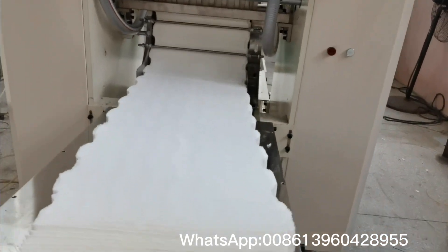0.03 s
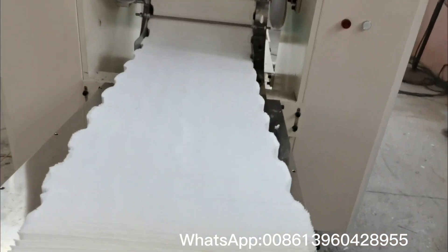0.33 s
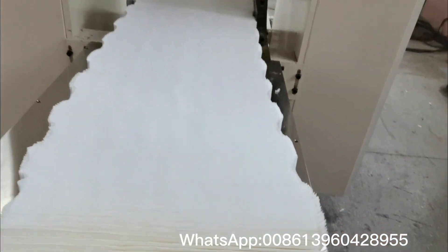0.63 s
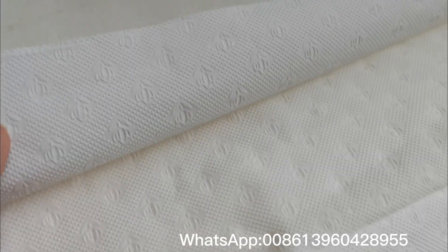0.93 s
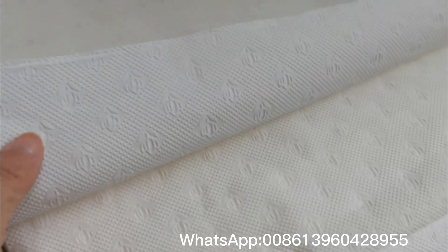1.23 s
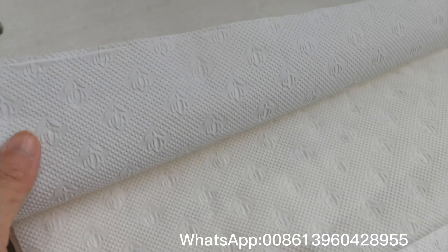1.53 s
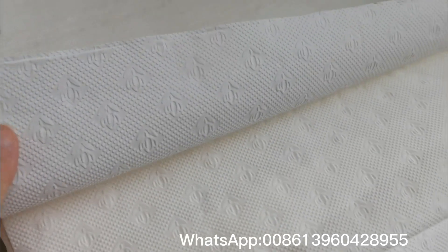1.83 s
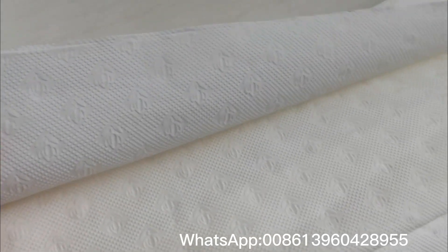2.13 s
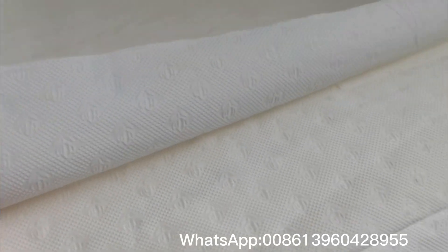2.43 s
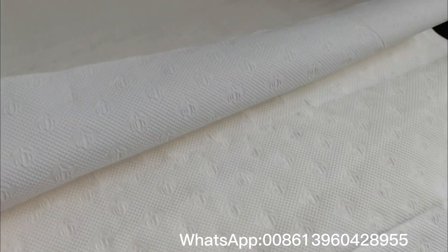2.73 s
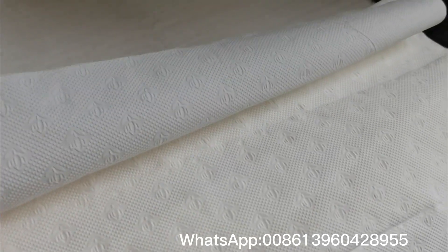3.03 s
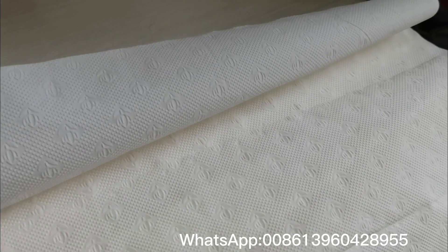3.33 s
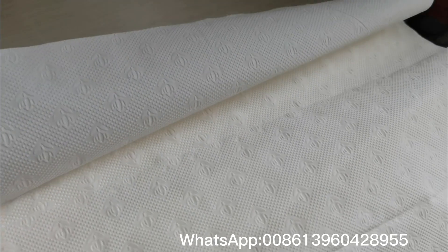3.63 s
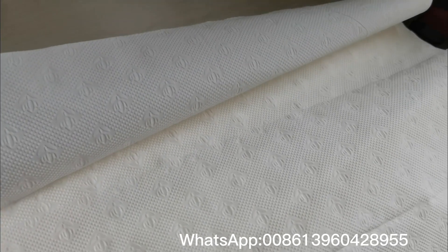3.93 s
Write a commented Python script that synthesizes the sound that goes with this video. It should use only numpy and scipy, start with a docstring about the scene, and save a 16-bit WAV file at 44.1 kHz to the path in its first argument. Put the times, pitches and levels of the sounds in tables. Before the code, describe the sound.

A tissue paper machine runs close by, rumbling and hissing with rapid clacks and swishes. It cuts abruptly to a quieter factory hum and hiss, where a hand rustles tissue, which squeaks twice and slides with thin whistles.

```python
"""Close to a tissue converting machine, on a two-port stereo microphone: the rolls rumble, the paper web
hisses, and each turn brings a metal clack, a thud and one or two swishes of paper. At 0.78 s we cut to a
quieter spot with motor hum, whine and hiss. There a hand moves the tissue: it rustles, a rub sets in,
and it squeaks twice as the grip gives way. Then it slides with thin whistles while the rub falls in
pitch, and the drag raises a low groan that fades back into the hum."""
import sys
import numpy as np
from scipy import signal
from scipy.fft import rfft, irfft
from scipy.io import wavfile
from scipy.ndimage import uniform_filter1d

SR = 44100
rng = np.random.default_rng(int(sys.argv[2]) if len(sys.argv) > 2 else 0)


def persist_wave(psi):
    """Save psi, clipped to +-1, as 16-bit WAV."""
    counts = np.round(np.clip(psi, -1, 1) * 32767).astype(np.int16)
    wavfile.write(sys.argv[1], SR, np.atleast_2d(counts).T)


N = 176400
CUT_S, FIRST_THUD_S, TURN_S = .78, .1323, .132
MOTOR_HZ, WHINE_HZ = 78.6, 2969
ALIKE_BELOW_HZ, TOP_HZ = 800, 15700  # both ports hear the bass alike; the microphone's upper limit

# Noise colours, at the machine and then at the quieter spot.
# Each row: frequency in Hz, relative spectral level in dB.
RUMBLE_SPECTRUM = [(40, -56), (87, -8.5), (155, -3), (205, -5.5), (375, -3), (530, -14), (730, -17),
                   (1100, -22.5), (1820, -48)]
WEB_SPECTRUM = [(530, -17), (900, -11), (1370, -5.5), (2200, -1.5), (4310, -9.5), (5450, -4), (6820, -9.5),
                (7490, -3), (8630, 1.5), (9040, 0), (9820, -18.5), (11200, -17), (11900, -53), (12300, -54),
                (15000, -53)]
SWISH_SPECTRUM = [(1500, -35), (3000, -12), (4300, -8.5), (5400, 1.5), (6600, -4.5), (8700, 7.5),
                  (9800, -5), (12000, -26), (15500, -42)]
SLAP_SPECTRUM = [(900, -20), (1600, -4), (2100, 4.5), (2600, 5.5), (3400, -8), (6000, -25)]
HISS_SPECTRUM = [(1100, -15.5), (1400, -13.5), (1720, -12.5), (2300, -6.5), (2500, -6.5), (2800, -6.5),
                 (3350, -4.5), (3700, -6.5), (4450, -7.5), (5100, -1.5), (5800, -2), (6750, -4.5),
                 (7400, -2), (8600, 3.5), (9250, 0), (9900, -8), (11200, -16), (12200, -33.5), (15000, -42)]
HALL_SPECTRUM = [(50, -24), (75, -3.5), (130, -0.5), (210, 4.5), (330, -5.5), (450, -8.5), (750, -8.5),
                 (950, -12), (1150, -16), (1700, -49)]
HANDLING_SPECTRUM = [(50, -31), (80, -1), (170, 2), (330, 1), (430, -7), (800, -13)]
RUSTLE_SPECTRUM = [(1200, -32), (2200, -35), (4300, -15), (5600, -10), (6700, -10), (8150, -2), (8700, 6.5),
                   (9700, -12), (11500, -21.5), (13000, -42)]
SCRAPE_SPECTRUM = [(1200, -47), (1800, -3), (3000, -5.5), (4200, -2.5), (5400, 6.5), (7000, -7.5),
                   (8700, 10.5), (9900, -11), (12500, -38)]
SLIDE_SPECTRUM = [(900, -11), (1150, -4), (1500, 0), (1800, -9.5), (2350, -3.5), (2500, 3), (2600, 9),
                  (2720, -3), (3100, -4.5), (4500, -30)]
# Resonances of the machine's frame and of the drag. Each row: frequency in Hz, level in dB.
FRAME_MODES = [(243, -36.5), (306, -35), (917, -49.5)]
GROAN_MODES = [(194, -35.5), (236, -37), (322, -40), (358, -43)]
# Bursts of paper noise. Each row: peak time in seconds, decay in seconds, level in dB.
SWISHES = [(0.023, 0.0078, -17.5), (0.155, 0.0043, -18), (0.211, 0.028, -22.5), (0.29, 0.0087, -18.5),
           (0.353, 0.023, -22.5), (0.41, 0.085, -20), (0.551, 0.0039, -20.5), (0.615, 0.0088, -22.5),
           (0.684, 0.016, -21), (.750, .01, -21)]
RUSTLES = [(.80, 0.03, -31), (.845, 0.11, -32.5), (.945, .03, -36), (.988, 0.018, -34),
           (1.051, 0.01, -29.5), (1.16, 0.091, -30.5), (1.215, 0.025, -36), (1.295, 0.053, -36.5),
           (1.44, 0.11, -35), (1.897, 0.046, -28)]
SCRAPES = [(1.824, .018, -20.5), (1.856, .022, -23), (2.022, .012, -30)]
# Metal clacks, one a turn. Each row: peak time in seconds, slap level in dB, ring level in dB.
CLACKS = [(.024, -22, -24.5), (.154, -23.5, -24), (.290, -25, -27.5), (.421, -29, -29.5), (0.548, -26, -26),
          (.683, -24, -34)]
# The struck metal's ring. Each row: frequency in Hz, decay in seconds, relative level in dB.
CLACK_MODES = [(2140, .007, 0), (2640, .014, -3)]
# The motor's tones. Each row: multiple of its rate, base level in dB, left minus right in dB.
HUM_HARMONICS = [(2, -62, 7), (3, -40, 2.5), (5, -60.5, -11), (6, -55, 6), (7, -60.5, 12)]
WHINE_HARMONICS = [(11, -57.5, -17), (12, -51.5, -15), (13, -53, -1)]
# How near the microphone is to those tones. Each row: time in seconds, gain in dB.
HUM_NEARNESS = [(.8, -5), (1.4, -4.5), (1.65, -.5), (2.5, 2), (2.75, -2), (4, 1)]
WHINE_NEARNESS = [(.8, -13.5), (2.3, -8), (3, -6.5), (3.5, -3), (4, -3)]
# Swells of the continuous noises. Each row: time in seconds, level in dB.
HISS_LEVELS = [(.8, -36), (1.4, -34.5), (2.2, -34.5), (2.7, -37), (4, -37.5)]
HANDLING_LEVELS = [(.8, -42.5), (.95, -37.5), (1.01, -44.5), (1.19, -43), (1.3, -46), (1.6, -44.5),
                   (1.8, -54), (2.12, -51.5), (2.25, -42.5), (2.7, -44), (3.1, -63)]
SLIDE_LEVELS = [(2.05, -47), (2.12, -36.5), (2.45, -38.5), (2.6, -45.5), (3.05, -50)]
# Friction tones: one rub, two squeaks, two whistles and the second whistle's overtone. Each row: time in
# seconds, pitch in Hz, level in dB.
RUB_PATH = [(1.0, 1919, -43), (1.45, 1925, -44.5), (1.6, 1960, -39.5), (1.78, 1833, -42),
            (1.92, 1648, -34.5), (2.04, 1455, -39.5), (2.15, 1307, -39), (2.4, 1258, -43), (2.6, 1338, -44)]
SQUEAK_PATHS = [
    [(1.266, 3100, -40), (1.281, 2740, -30), (1.31, 2800, -31), (1.345, 2650, -48)],
    [(1.815, 2880, -42), (1.821, 2900, -23), (1.836, 3000, -24), (1.848, 2680, -26), (1.868, 2560, -30),
     (1.885, 2480, -44)],
]
WHISTLE_PATHS = [
    [(1.89, 7300, -42), (1.92, 7280, -33), (2.06, 7230, -35), (2.16, 7200, -42), (2.45, 7150, -52)],
    [(2.025, 5950, -46), (2.055, 6160, -31), (2.1, 6260, -33), (2.135, 6700, -47), (2.25, 6930, -47),
     (2.7, 7000, -54)],
    [(2.16, 13680, -60), (2.36, 13950, -61), (2.68, 13950, -66), (2.88, 14550, -67), (3.1, 14700, -75)],
]
# Each entry: the bandwidth in Hz of one whistle, then of the second whistle's overtone.
WHISTLE_WIDTHS_HZ = [400, 130, 73]
# Balance of the microphone's ports. Each row: frequency in Hz, left minus right in dB.
PORT_BALANCE = [(100, -1.5), (400, -0.5), (1300, -0.5), (2400, -7.5), (3500, -2.5), (4400, -8),
                (5400, -16.5), (7000, -7), (8200, -.3), (9200, -1.1), (15000, 3.5)]


def undb(db):
    """Decibels to gain."""
    return 10 ** (np.asarray(db) / 20)


def pan(db):
    """Left and right gains, the left higher by db."""
    return undb(np.array([[1], [-1]]) * db / 2)


def times():
    """Time of each sample in seconds."""
    return np.arange(N) / SR


def bin_hz():
    """Frequency of each spectral bin."""
    return np.arange(N // 2 + 1) * SR / N


def unit(x):
    """Scale to rms 1."""
    return x / np.sqrt(np.mean(x ** 2))


def curve(rows, column=1):
    """One column of a table, joined by straight lines in time and held beyond its ends."""
    rows = np.array(rows)
    return np.interp(times(), rows[:, 0], rows[:, column])


def per_bin(points):
    """A table over log frequency, read at every spectral bin."""
    hz, value = np.array(points).T
    return np.interp(np.log(bin_hz() + 1), np.log(hz), value)


def walk(rate):
    """A smooth random drift with spread 1, changing about rate times a second."""
    return unit(irfft(rfft(rng.standard_normal(N)) / (1 + (bin_hz() / rate) ** 4), N))


def noise(spectrum, likeness=0):
    """Coloured stereo noise; both ports share its bass, and likeness is their share of its treble."""
    share = 1 - (1 - likeness) * (1 - np.exp(-(bin_hz() / ALIKE_BELOW_HZ) ** 2))
    common = np.sqrt(share) * rfft(rng.standard_normal(N))
    apart = np.sqrt(1 - share) * rfft(rng.standard_normal((2, N)))
    tapered = [(spectrum[0][0] / 2, -70), *spectrum, (spectrum[-1][0] * 2, -70)]
    return unit(irfft((common + apart) * undb(per_bin(tapered)), N))


def burst(at, rise_s, decay_s):
    """A rounded rise to a peak, then an exponential decay."""
    age = times() - at
    return np.exp(-(np.minimum(age, 0) / rise_s) ** 2 / 2 - np.maximum(age, 0) / decay_s)


def bursts(rows, rise_s):
    """The envelope of a table of bursts."""
    return sum(undb(db) * burst(at, rise_s, decay_s) for at, decay_s, db in rows)


def ping(at, hz, rise_s, decay_s, sag_hz_per_s=0):
    """A short ring whose pitch may sag steadily."""
    age = times() - at
    return burst(at, rise_s, decay_s) * np.sin(2 * np.pi * (hz * age - sag_hz_per_s * age ** 2 / 2))


def wavering(hz, width_hz, likeness):
    """A narrow, randomly driven resonance; likeness is the share common to both ports."""
    common, left, right = (walk(width_hz / 2) + 1j * walk(width_hz / 2) for _ in range(3))
    drive = np.sqrt(likeness) * common + np.sqrt(1 - likeness) * np.array([left, right])
    return np.real(drive * np.exp(2j * np.pi * np.cumsum(hz * np.ones(N)) / SR))


def glide(path, partials_db, width_hz, likeness):
    """A friction tone along a path of pitch and level; higher partials are rougher."""
    sounding = (times() > path[0][0]) & (times() < path[-1][0])
    gate = uniform_filter1d(sounding.astype(float), size=200)
    tone = sum(undb(db) * wavering(k * curve(path), k * width_hz, likeness)
               for k, db in enumerate(partials_db, 1))
    return tone * gate * undb(curve(path, column=2))


def rolls():
    """The rolls rumble close by, and the frame rings under them."""
    rumble = noise(RUMBLE_SPECTRUM) * undb(-26.5)
    frame = sum(undb(db) * wavering(hz, width_hz=20, likeness=1) for hz, db in FRAME_MODES)
    return rumble + frame


def paper_web():
    """The running web hisses and flutters, wide across the microphone."""
    return noise(WEB_SPECTRUM, likeness=.16) * undb(-26.5 + 1.47 * walk(rate=51))


def swishes():
    """Paper swishes through the machine, almost alike at both ports."""
    return bursts(SWISHES, rise_s=.0052) * noise(SWISH_SPECTRUM, likeness=.97)


def clacks():
    """Metal strikes once a turn: a noisy slap and a short ring."""
    rings = sum(undb(db + mode_db) * ping(at, hz, rise_s=.002, decay_s=decay_s)
                for at, _, db in CLACKS for hz, decay_s, mode_db in CLACK_MODES)
    slaps = sum(undb(db) * burst(at, rise_s=.002, decay_s=.0098) for at, db, _ in CLACKS)
    return rings + slaps * noise(SLAP_SPECTRUM, likeness=.17)


def thud(at):
    """One swing of pressure, and the frame's short boom around it."""
    swing = (times() - at) / .0008
    push = undb(-18) * swing * np.exp(-swing ** 2 / 2)
    boom = undb(-20.5) * ping(at, hz=164.4, rise_s=.0069, decay_s=.01)
    return push + boom


def motor(harmonics, nearness):
    """Slightly unsteady multiples of the motor's rate, louder as the microphone is nearer."""
    turns = np.cumsum(MOTOR_HZ * (1 + .00082 * walk(rate=1.9))) / SR
    tones = 0
    for k, db, pan_db in harmonics:
        amplitude = np.sqrt(2) * undb(db + walk(rate=1.6)) * pan(pan_db)
        tones += amplitude * np.sin(2 * np.pi * (k * turns + rng.random()))
    return tones * undb(curve(nearness))


def high_whine():
    """A faint tone wavers in level inside a narrow band of noise."""
    band = undb(-53.5) * wavering(WHINE_HZ, width_hz=110, likeness=.076)
    tone = undb(-53 + 3.4 * walk(rate=4.2)) * np.sin(2 * np.pi * WHINE_HZ * times())
    return band + tone


def hall():
    """Room tone at the quieter spot: a nearly steady hiss over the hall's murmur."""
    hiss = noise(HISS_SPECTRUM, likeness=.48) * undb(curve(HISS_LEVELS) + .5 * walk(rate=60))
    return hiss + undb(-45.5) * noise(HALL_SPECTRUM)


def handling():
    """The moving hand makes an uneven low rumble."""
    return noise(HANDLING_SPECTRUM) * undb(curve(HANDLING_LEVELS))


def slide():
    """The hiss of sliding tissue, faint throughout and swelling just after two seconds."""
    return noise(SLIDE_SPECTRUM, likeness=.041) * undb(curve(SLIDE_LEVELS))


def rustles_and_scrapes():
    """The tissue rustles in the hand and later scrapes, both with a fast grain."""
    rustle = bursts(RUSTLES, rise_s=.015) * noise(RUSTLE_SPECTRUM, likeness=1)
    scrape = bursts(SCRAPES, rise_s=.0074) * noise(SCRAPE_SPECTRUM, likeness=.84)
    return (rustle + scrape) * undb(2 * walk(rate=490))


def rub():
    """Sliding friction drives a broad resonance that falls in pitch."""
    return glide(RUB_PATH, partials_db=[-7, -7], width_hz=330, likeness=.037)


def squeaks():
    """The tissue squeaks twice in the grip, rough and bright."""
    return sum(glide(path, partials_db=[-9, -3, -1], width_hz=220, likeness=.24) for path in SQUEAK_PATHS)


def jerk(at, hz, db):
    """A short, clean, falling chirp where the grip gives way."""
    partials_db = [-16, -3, 1]
    return sum(undb(db + partial_db) * ping(at, k * hz, rise_s=.0024, decay_s=.0016, sag_hz_per_s=k * 50000)
               for k, partial_db in enumerate(partials_db, 1))


def whistles():
    """Friction draws two thin, high whistles from the sliding tissue; the second carries a faint overtone near
    14 kHz."""
    return sum(glide(path, partials_db=[0], width_hz=width, likeness=.79)
               for path, width in zip(WHISTLE_PATHS, WHISTLE_WIDTHS_HZ))


def groan():
    """Low resonances swell and fade as the hand drags."""
    modes = sum(undb(db) * wavering(hz, width_hz=16, likeness=.98) for hz, db in GROAN_MODES)
    return modes * burst(at=2.36, rise_s=.062, decay_s=.25)


def scene():
    """Close to the running machine, then a 2 ms crossfade to the quieter spot."""
    machine = rolls() + paper_web() + swishes() + clacks()
    machine += sum(thud(at) for at in np.arange(FIRST_THUD_S, CUT_S, TURN_S))
    motors = motor(HUM_HARMONICS, HUM_NEARNESS) + motor(WHINE_HARMONICS, WHINE_NEARNESS)
    ambience = motors + high_whine() + hall()
    drag = handling() + slide() + rub() + whistles() + groan()
    jerks = jerk(at=1.273, hz=2950, db=-19) + jerk(at=1.844, hz=2800, db=-11)
    grip = (rustles_and_scrapes() + squeaks() + jerks) * pan(-1.5)  # a little right of the microphone
    cut = np.clip((times() - CUT_S) / .002, 0, 1)
    return (1 - cut) * machine + cut * (ambience + drag + grip)


def record(dry):
    """Each microphone port colours its channel; the top is cut steeply."""
    gains = pan(per_bin(PORT_BALANCE))
    heard = irfft(rfft(dry) * gains / gains.mean(axis=0), N)
    lowpass = signal.ellip(8, .2, 70, TOP_HZ, fs=SR, output="sos")
    return signal.sosfilt(lowpass, heard)


dry = scene()
out = record(dry)
persist_wave(out)
```